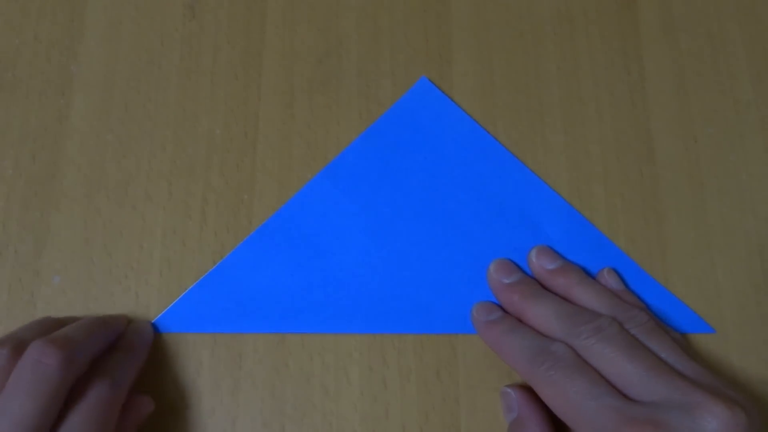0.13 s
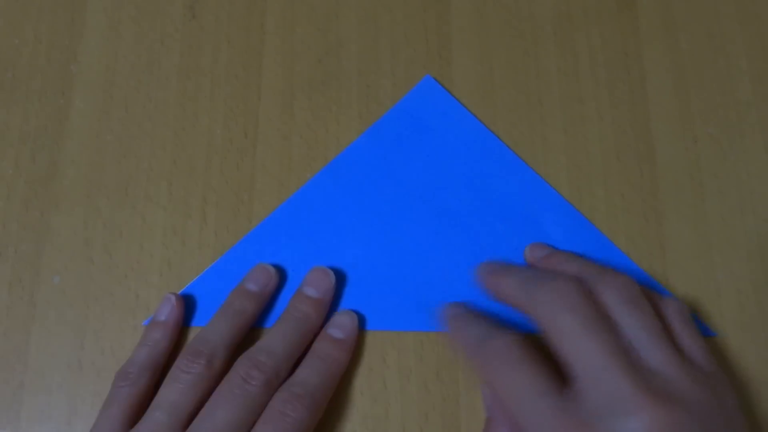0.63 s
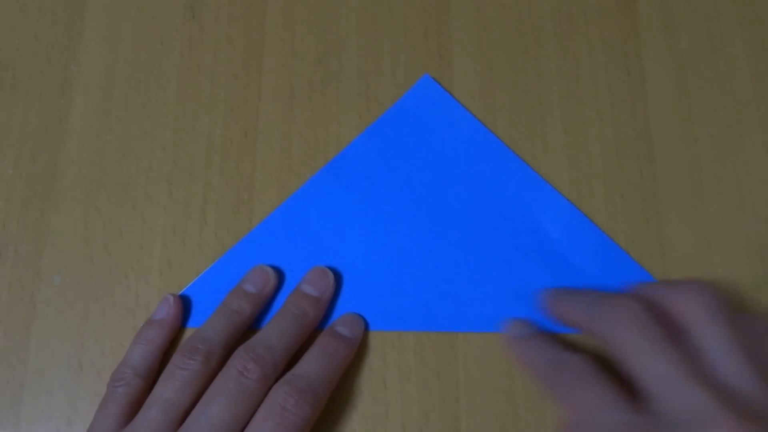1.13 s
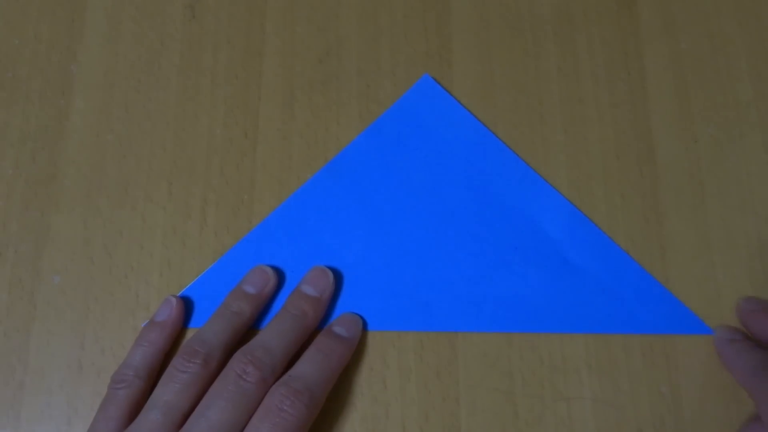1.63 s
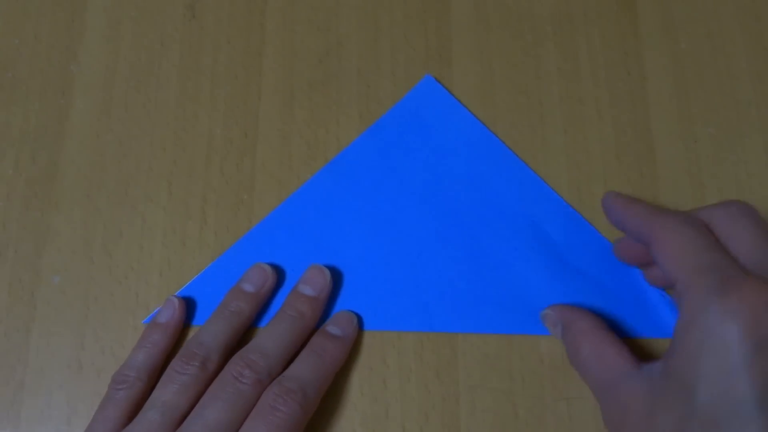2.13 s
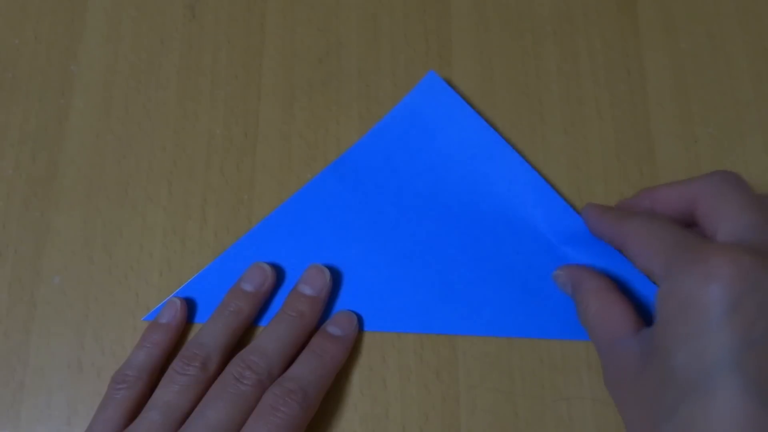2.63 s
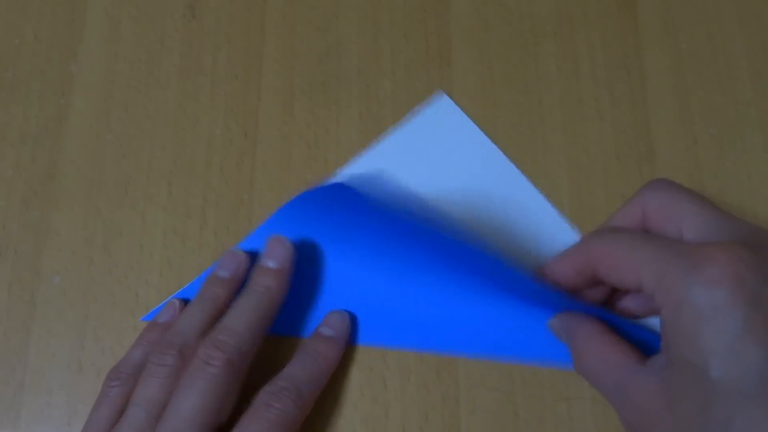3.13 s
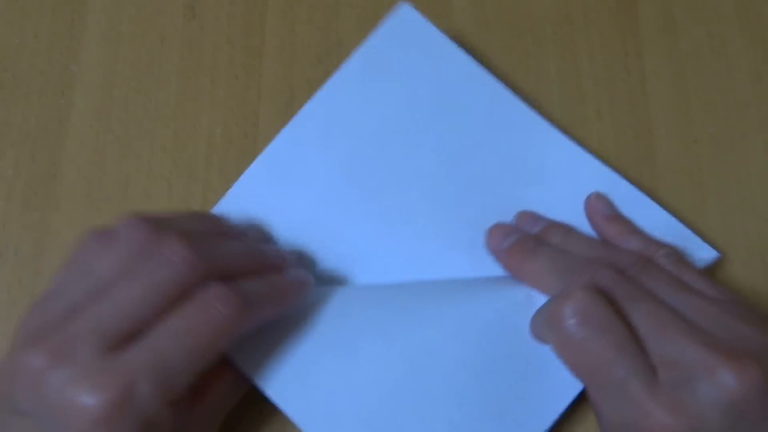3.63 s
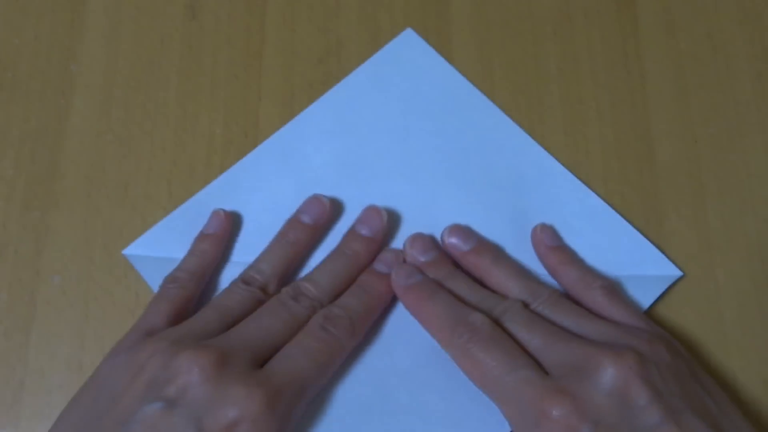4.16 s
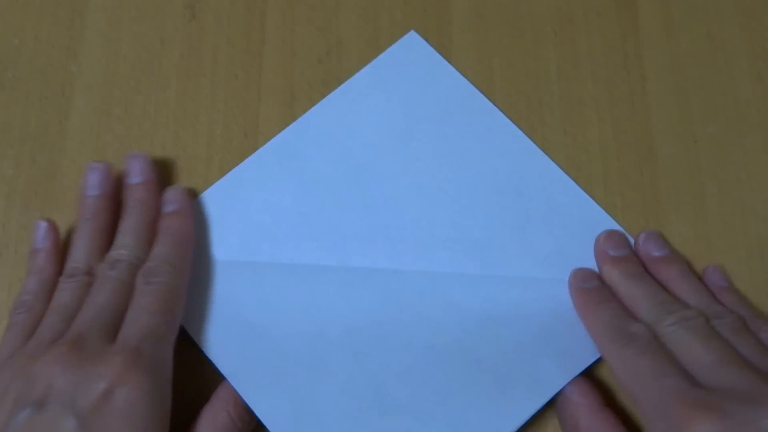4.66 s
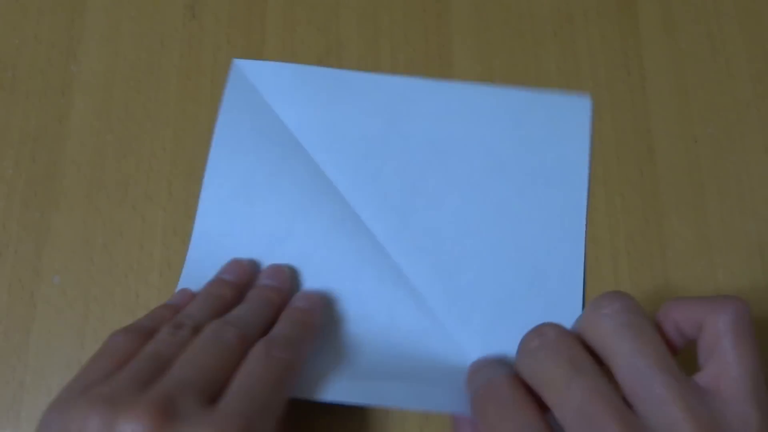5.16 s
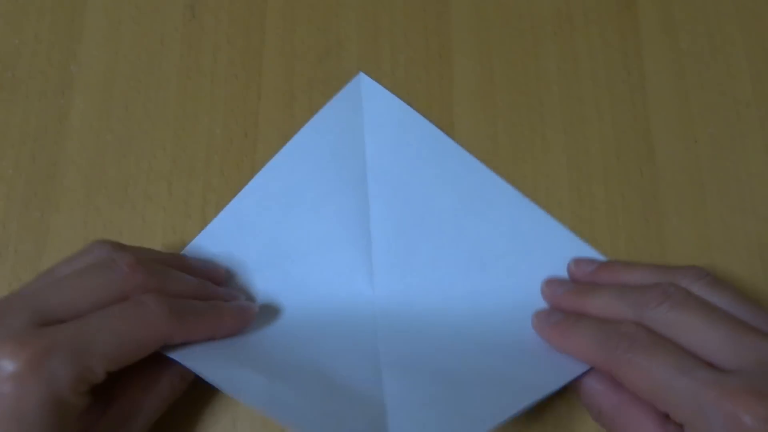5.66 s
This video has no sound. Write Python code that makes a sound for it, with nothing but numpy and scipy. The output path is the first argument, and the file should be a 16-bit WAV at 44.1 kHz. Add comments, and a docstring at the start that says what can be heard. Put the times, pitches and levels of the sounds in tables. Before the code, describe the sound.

Close dry paper rustles, sharp snaps and fingertip swishes as a folded sheet is opened and turned, over faint fan-like noise.

```python
"""Paper handled on a wooden table

Fingers crease, unfold and turn a sheet: skin and paper slide as filtered, gritty noise with a bright hiss.
The lifted sheet rustles in a lower noise band, snaps in short coloured bursts and puffs low decaying sines.
A hand lands early on as a tight cluster of thuds, ringing three low table modes.
Behind it lies steady stereo room noise with a fan-like hum and a band near 1 kHz, strongest out of phase."""
import sys
import numpy as np
from scipy import signal
from scipy.fft import rfft, irfft
from scipy.io import wavfile
from scipy.ndimage import uniform_filter1d

SR = 44100
rng = np.random.default_rng(int(sys.argv[2]) if len(sys.argv) > 2 else 0)


def dump(signal):
    """Clip the signal to [-1, 1] and save it as 16-bit WAV at the path in sys.argv[1]."""
    limited = np.clip(np.atleast_2d(signal).T, -1, 1)
    pcm = np.round(limited * 32767).astype(np.int16)
    wavfile.write(sys.argv[1], SR, pcm)


def makeup_ratio(level_db):
    """Linear amplitude ratio for a level in decibels (20 dB per factor of ten)."""
    decades = np.asarray(level_db, float) / 20
    return 10 ** decades


N = 254898  # samples


def evened(x):
    """Scales x to a mean square of 1."""
    return x / np.sqrt(np.mean(x ** 2) + 1e-20)


def read(points, hz):
    """Reads a (frequency, dB) curve at hz, in straight lines over log frequency."""
    point_hz, value = np.transpose(points)
    return np.interp(np.log(hz + 1), np.log(point_hz + 1), value)


def add(mix, start_s, sound):
    """Lays a sound into the mix, cut off at the end of the mix."""
    part = mix[max(round(start_s * SR), 0):][:len(sound)]
    part += sound[:len(part)]


def bump(hz, centre_hz, octaves):
    """Bell-shaped gain on a log-frequency axis."""
    return np.exp(-.5 * (np.log2((hz + 1) / centre_hz) / octaves) ** 2)


def spectral_grid(size):
    """Bin frequencies and frame times of short-time spectra."""
    hz = np.fft.rfftfreq(size, 1 / SR)[:, None]
    t = np.arange(4 * N // size + 5) * size / 4 / SR
    return hz, t


def shape(x, gain, size):
    """Weights the short-time spectra of x by gain (bins x frames)."""
    spectra = signal.stft(x, nperseg=size, noverlap=3 * size // 4)[2]
    weighted = spectra * gain[:, :spectra.shape[-1]]
    return signal.istft(weighted, nperseg=size, noverlap=3 * size // 4)[1][..., :N]


def patches(hz, t, bins, frames):
    """Random blotches over time and frequency, spread 1."""
    noise = rng.standard_normal((len(t), len(hz)))
    over_time = uniform_filter1d(noise, frames, 0)
    return evened(uniform_filter1d(over_time, bins, 1)).T


def grit(per_s, spread_db, share):
    """Noise with sparse fibre slips of uneven size taking a share of its power."""
    size = makeup_ratio(spread_db * np.minimum(rng.exponential(1, N), 4))
    slips = size * (rng.random(N) < per_s / SR)
    smooth = rng.standard_normal(N)
    rough = evened(slips * rng.standard_normal(N))
    return np.sqrt(1 - share) * smooth + np.sqrt(share) * rough


# What rubs, from one fingertip (high, narrow) to the whole sheet (lower, wide):
# time_s, centre_hz, width_octaves
RUBBING_CONTACT = [(0, 8750, 0.49), (.6, 9800, .22), (1.14, 11100, 0.21), (1.7, 7800, 0.73),
                   (2.189, 9000, 0.41), (2.45, 6760, 1), (2.95, 4730, 0.46), (3.36, 6070, 0.69),
                   (3.55, 6100, .58), (3.68, 7540, 0.2), (3.9, 5800, .5), (4.3, 7350, 1), (4.6, 7240, 1),
                   (4.89, 6670, 0.36), (5.02, 6200, 0.17), (5.27, 6060, 0.2), (5.5, 6070, 0.27),
                   (5.78, 6750, 0.57)]
# Colour the free sheet radiates: frequency_hz, relative_level_db
SHEET_COLOUR = [(200, -40), (500, -7.5), (750, -15.5), (1100, 3.5), (1600, -5.5), (2400, -3.5),
                (3500, -8.5), (5000, -15), (9000, -66)]


def sliding():
    """Friction hiss, whose bump moves with what rubs, plus the lower rustle of the sheet."""
    hz, t = spectral_grid(size=256)
    time_s, *columns = np.transpose(RUBBING_CONTACT)
    centre_hz, octaves = (np.interp(t, time_s, c) for c in columns)
    hiss_gain, rustle_gain = motion(t)
    reflection = comb(hz, t)

    # a flat skirt joins the bump and grows with the width of the contact
    skirt = makeup_ratio(-6.5 + 17 * octaves)
    low_cut = hz ** 6 / (hz ** 6 + (0.49 * centre_hz) ** 6)
    hiss = (bump(hz, centre_hz, np.maximum(octaves, .1)) + skirt) * low_cut
    hiss = hiss / np.sqrt((hiss ** 2).mean(0))
    # blotches in dB: some patchy in pitch, some moving the whole spectrum
    hiss_db = 2.5 * patches(hz, t, bins=4, frames=40) + 0.65 * patches(hz[:1], t, bins=1, frames=6)
    hiss = hiss * hiss_gain * makeup_ratio(hiss_db)

    rustle_db = 1.96 * patches(hz, t, bins=4, frames=8) + 1.35 * patches(hz[:1], t, bins=1, frames=4)
    rustle = evened(makeup_ratio(read(SHEET_COLOUR, hz))) * rustle_gain * makeup_ratio(rustle_db)

    skin = shape(grit(4000, 2.1, 0.094), hiss * reflection, size=256)
    sheet = shape(grit(800, 3.9, 0.2), rustle * reflection, size=256)
    return skin + sheet


# Strokes of skin and paper: peak_s, hiss_db, rise_s, fall_s, rustle_relative_to_hiss_db
HAND_STROKES = [(0.0, -58, .1, 0.28, -8), (.586, -51, 0.013, 0.029, -25), (.715, -55, 0.23, 0.32, -22),
                (1.054, -47.5, 0.17, 0.59, -25), (1.15, -45.5, 0.2, 0.22, -15), (1.33, -64, .3, 1, -5),
                (2.194, -40, 0.02, 0.069, -22), (2.339, -43.5, 0.077, 0.092, -9),
                (2.454, -48.5, 0.18, 0.15, -17), (2.641, -51, 0.023, 0.092, -9),
                (2.9, -55.5, 0.015, 0.17, -2), (2.97, -45, 0.049, 0.085, -6), (3.04, -53.5, 0.024, 0.26, 0),
                (3.135, -45, 0.044, 0.54, -15), (3.172, -44.5, 0.06, 0.086, 3), (3.24, -47, 0.16, 0.077, 3),
                (3.364, -41.5, 0.46, 0.045, -14.5), (3.47, -52, 0.32, 0.24, -2),
                (3.59, -44.5, 0.024, 0.055, 8), (3.61, -42.5, 0.093, 0.56, -11.5),
                (3.68, -43.5, 0.17, 1, -5.5), (3.86, -54, 0.5, 0.018, 9), (3.9, -42.5, 0.14, 0.68, -28),
                (4.036, -42, .5, 0.09, -8), (4.298, -36, 0.16, 0.5, -16.5), (4.7, -47, 0.12, .4, -18),
                (4.891, -39.5, 0.2, 0.15, -15), (5.004, -43, 0.21, 0.11, -12), (5.15, -48.5, 0.8, .3, -11),
                (5.21, -41, 0.041, .15, -16), (5.243, -39, 0.07, 0.089, -18),
                (5.362, -38.5, 0.32, 0.056, -13.5), (5.5, -42.5, .3, 0.23, -16),
                (5.606, -41.5, 0.52, 0.27, -11.5), (5.72, -45, 0.25, 0.39, -14)]
RESTING_HISS_DB, RESTING_RUSTLE_DB = -81, -70  # fingers lying still on the paper
# the sheet trembles on after deep snaps; higher snaps shake it less
SHIVER_DB, SHIVER_HZ, SHIVER_STEEPNESS = -5, 3400, 3.1
SHIVER_RISE_S, SHIVER_FALL_S = 0.015, 0.096


def motion(t):
    """Gains of hiss and rustle: stroke powers add up, and snaps shake the sheet by energy and depth."""
    hiss = makeup_ratio(RESTING_HISS_DB) ** 2
    rustle = makeup_ratio(RESTING_RUSTLE_DB) ** 2
    for peak_s, hiss_db, rise_s, fall_s, rustle_db in HAND_STROKES:
        gesture = swell(t, peak_s, rise_s, fall_s)
        hiss = hiss + makeup_ratio(hiss_db) ** 2 * gesture
        rustle = rustle + makeup_ratio(hiss_db + rustle_db) ** 2 * gesture
    for start_s, peak_db, centre_hz, length_s, _ in PAPER_SNAPS:
        depth = 1 / (1 + (centre_hz / SHIVER_HZ) ** SHIVER_STEEPNESS)
        energy = makeup_ratio(peak_db + SHIVER_DB) ** 2 * length_s
        tremble = swell(t, start_s + SHIVER_RISE_S, SHIVER_RISE_S, SHIVER_FALL_S)
        rustle = rustle + energy * depth ** 2 * tremble
    return np.sqrt(hiss), np.sqrt(rustle)


def swell(t, peak_s, rise_s, fall_s):
    """Power of a gesture, 20 dB down one rise before and one fall after its peak."""
    before = (peak_s - t) / max(rise_s, .005)
    after = (t - peak_s) / max(fall_s, .005)
    return makeup_ratio(-20 * np.where(t < peak_s, before, after)) ** 2


# A hand or raised part of the sheet throws the sound back and combs it:
# start_s, end_s, first_spacing_hz, last_spacing_hz, strength (0-1)
CLOSE_BOUNCES = [(0.985, 1.4, 3120, 2600, 0.04), (2.877, 3.168, 1800, 1690, 0.15),
                 (5.2, 5.426, 3400, 2550, 0.3)]


def comb(hz, t):
    """Gain of the direct sound plus one close reflection whose delay drifts; mean power about 1."""
    gain = np.ones((len(hz), len(t)))
    for start_s, end_s, first_hz, last_hz, strength in CLOSE_BOUNCES:
        part = np.clip((t - start_s) / (end_s - start_s), 0, 1)
        back = np.clip(strength, 0, .9) * np.sin(np.pi * part) ** .5
        spacing_hz = first_hz + (last_hz - first_hz) * part
        ripple = 2 * back / (1 + back ** 2) * np.cos(2 * np.pi * hz / spacing_hz)
        gain = gain * np.sqrt(1 + ripple)
    return gain


# Buckles and scuffs of the paper: start_s, peak_db, centre_hz, fall_by_40_db_s, width_octaves
PAPER_SNAPS = [(0.001, -42.5, 1840, .15, 0.22), (.2617, -46, 7400, .004, 0.32),
               (0.28, -42.5, 1830, 0.015, 0.75), (.315, -48, 9600, 0.039, 0.31),
               (0.58, -42, 8740, .027, 0.26), (1.7205, -29.5, 9800, 0.0085, 0.4),
               (2.05, -51, 9900, 0.041, .3), (2.14, -44.5, 8000, 0.033, 1.3),
               (2.187, -28, 8300, 0.02, 1.14), (2.201, -30, 8600, .011, 1.5),
               (2.2198, -36.5, 7340, .017, 1.1), (2.2904, -35.5, 7300, 0.041, 1.2),
               (2.311, -37, 8900, 0.011, .5), (2.3285, -22.5, 7600, 0.039, 0.98),
               (2.346, -27, 7220, .018, 0.9), (2.362, -30, 6500, .053, 0.91),
               (2.369, -22, 5390, 0.0065, 1.5), (2.41, -30, 7060, 0.033, 0.84),
               (2.442, -32, 5270, 0.0064, .74), (2.447, -24.5, 5900, 0.01, 0.78),
               (2.5015, -33, 7300, 0.015, 1.2), (2.59, -28.5, 9000, 0.0081, 0.57),
               (2.6304, -22, 7160, 0.011, 0.92), (2.786, -34.5, 5170, 0.01, 0.92),
               (2.8934, -37, 5500, 0.023, 1.3), (3.1782, -12, 4700, 0.0088, 0.9),
               (3.199, -35, 2000, .01, 0.47), (3.2186, -19.5, 3610, 0.013, 4.9),
               (3.298, -28.5, 2300, 0.0059, 0.84), (3.424, -27.5, 2160, 0.035, 1.53),
               (3.4317, -27.5, 1850, 0.029, 0.68), (3.4893, -29.5, 5900, 0.038, 0.57),
               (3.5155, -30.5, 3050, 0.018, 1.5), (3.551, -32.5, 4320, 0.026, 1.5),
               (3.584, -13, 4400, 0.0066, 1.27), (3.738, -26, 2500, 0.014, 0.96),
               (3.8022, -9, 2660, 0.005, 0.63), (3.8082, -14.5, 1710, 0.0075, 0.64),
               (3.852, -32, 2190, 0.026, 0.39), (3.918, -35.5, 1320, 0.034, 0.22),
               (3.9876, -22.5, 2700, 0.005, 0.74), (3.993, -32, 1520, 0.056, 0.15),
               (4.003, -27.5, 3200, 0.0041, .28), (4.0483, -30, 4690, 0.0054, .37),
               (4.068, -30, 2150, 0.022, 0.97), (4.081, -29, 2310, 0.011, 1.4),
               (4.113, -29, 1980, 0.015, 1.2), (4.1276, -27.5, 2660, 0.0099, 0.59),
               (4.1813, -25, 4830, 0.012, 0.43), (4.183, -27, 3000, .01, 0.44),
               (4.624, -43.5, 1700, 0.11, .19), (5.3649, -28.5, 6000, 0.014, 1.1),
               (5.381, -28, 6100, 0.0027, 0.25)]


def snaps():
    """Each buckle is a sharp flick and brief crackle, coloured by the size of the part that gives."""
    size, lead = 4096, 64  # samples; the lead leaves room for the filter to ring ahead of the flick
    out, t, hz = np.zeros(N), np.arange(size) / SR, np.fft.rfftfreq(size, 1 / SR)
    whole_sheet = makeup_ratio(-16.0) * makeup_ratio(read(SHEET_COLOUR, hz))
    crackle = rng.standard_normal((len(PAPER_SNAPS), size))
    for (start_s, peak_db, centre_hz, length_s, octaves), noise in zip(PAPER_SNAPS, crackle):
        length_s = max(length_s, .002)
        burst = noise * makeup_ratio(-40 * (t / length_s) ** 0.89) * np.minimum(t / 0.0012, 1)
        # short buckles are nearly one flick out and back, long ones a scuff
        half_cycle = round(SR / centre_hz / 2)
        burst[[12, 12 + half_cycle]] += np.array([1, -1]) * 0.02 / length_s
        colour = bump(hz, centre_hz, max(octaves, .15)) + whole_sheet
        burst = irfft(rfft(np.roll(burst, lead)) * colour)
        add(out, start_s - lead / SR, makeup_ratio(peak_db) * burst / abs(burst).max())
        # the crease knocks against the table, loudest for large buckles
        fade = makeup_ratio(-60 * t / 0.018) * np.minimum(t * centre_hz / 2, 1)
        knock = np.sin(2 * np.pi * 1265.0 * t) * fade
        add(out, start_s, makeup_ratio(peak_db) * min(700.0 / centre_hz, 1) * knock)
    return out


# Puffs of air under the sheet: start_s, level_db, pitch_hz
AIR_FLAPS = [(3.213, -46.5, 286), (3.421, -42.5, 208), (3.578, -40.5, 180), (3.734, -43, 145)]


def flaps():
    """The lifted sheet slaps the air under it: a short, decaying low sine."""
    out, t = np.zeros(N), np.arange(SR // 8) / SR
    for start_s, level_db, pitch_hz in AIR_FLAPS:
        fade = makeup_ratio(level_db - 60 * t / 0.13) * np.minimum(t / 0.0027, 1)
        add(out, start_s, fade * np.sin(2 * np.pi * pitch_hz * t))
    return out


# Hand landing on the table: start_s, level_db
HAND_THUDS = [(.586, -36), (0.606, -27), (0.641, -39), (0.687, -37)]
# Ringing modes of the table top: pitch_hz, level_db, t60_s
TABLE_MODES = [(75.4, -4.5, 0.32), (103, -18, 0.086), (170, -21, .06)]


def thuds():
    """A soft push rings the low modes of the table top."""
    out, t = np.zeros(N), np.arange(SR // 2) / SR
    ring = np.zeros(len(t))
    for pitch_hz, level_db, t60_s in TABLE_MODES:
        ring += makeup_ratio(level_db - 60 * t / t60_s) * np.sin(2 * np.pi * pitch_hz * t)
    for start_s, level_db in HAND_THUDS:
        add(out, start_s, makeup_ratio(level_db) * ring * np.minimum(t / 0.0033, 1))
    return out


def echoes(x):
    """Reflections from table and walls as a decaying noise tail, different at each microphone."""
    level_db, t60_s = -9.5, 0.17
    t = np.arange(SR // 4) / SR
    tail = rng.standard_normal((2, len(t))) * makeup_ratio(-60 * t / t60_s) * (t > .003)
    tail = tail / np.linalg.norm(tail[0])
    return makeup_ratio(level_db) * signal.fftconvolve(x[None], tail, axes=1)[:, :N]


# Room colour in phase: frequency_hz, relative_level_db
MID_COLOUR = [(12, -31), (20, 3), (85, -2), (199, -6), (252, -9.5), (337, -8.5), (385, -16), (439, -12),
              (806, -18.5), (995, -5.5), (1200, -4.5), (1480, -6.5), (1780, -18.5), (2510, -29.5),
              (11000, -36.5), (14300, -59), (22000, -120)]
# Room colour out of phase: frequency_hz, relative_level_db
SIDE_COLOUR = [(12, -60), (20, -25), (157, -14.5), (346, -13), (806, -18.5), (995, 2), (1200, -12),
               (1520, -13), (1930, -25), (2140, -21), (2570, -32.5), (2940, -29), (4370, -37.5),
               (10200, -46), (11000, -43), (14300, -77), (22000, -120)]
# Fan-like hum, in phase: centre_hz, width_hz, level_db
HUM_TONES = [(82.5, 15, -61), (250, 9.4, -65.5), (388.4, 8.6, -67.5)]


def room():
    """Steady noise, one colour in phase and one out of phase, with wavering hum bands in phase."""
    hz, t = spectral_grid(size=4096)
    mid_gain = makeup_ratio(-52.5) * evened(makeup_ratio(read(MID_COLOUR, hz)))
    side_gain = makeup_ratio(-50) * evened(makeup_ratio(read(SIDE_COLOUR, hz)))
    for centre_hz, width_hz, level_db in HUM_TONES:
        peak = evened(1 / (1 + (2 * (hz - centre_hz) / width_hz) ** 2))
        mid_gain = np.hypot(mid_gain, makeup_ratio(level_db) * peak)

    def wavering(gain):
        """Noise in one colour, with slight blotches."""
        blotches = makeup_ratio(0.25 * patches(hz, t, bins=30, frames=4))
        return shape(rng.standard_normal(N), gain * blotches, size=4096)

    mid, side = wavering(mid_gain), wavering(side_gain)
    return np.array([mid + side, mid - side])


def scene():
    """Paper with its echoes, the dry thuds and flaps in the centre, and the room behind."""
    paper = sliding() + snaps()
    return paper + echoes(paper) + thuds() + flaps() + room()


def roll_off(x):
    """The treble ends steeply here."""
    return signal.sosfilt(signal.butter(12, 12310, fs=SR, output="sos"), x)


def record(dry):
    """Steep treble limit at 10990 Hz and a slight level offset between the microphones."""
    low_pass = signal.firwin(601, 10990, window=("kaiser", 5), fs=SR)
    limited = signal.oaconvolve(dry, low_pass[None], "same")
    limited = limited * makeup_ratio([[-.2], [.2]])  # the right microphone is a little hotter
    return roll_off(limited)


dry = scene()
out = record(dry)
dump(out)
```